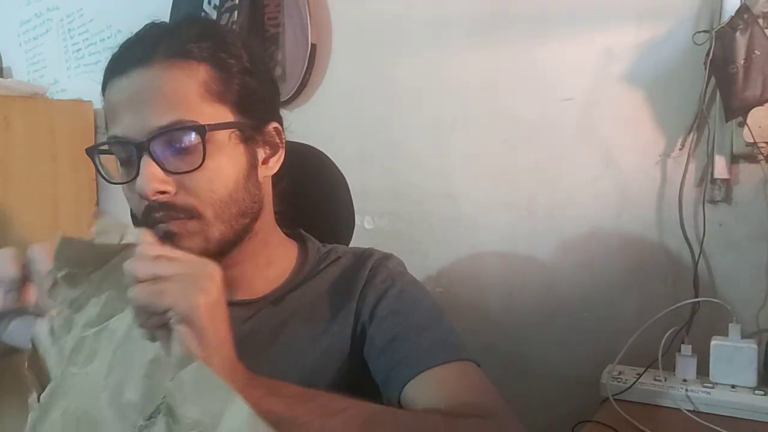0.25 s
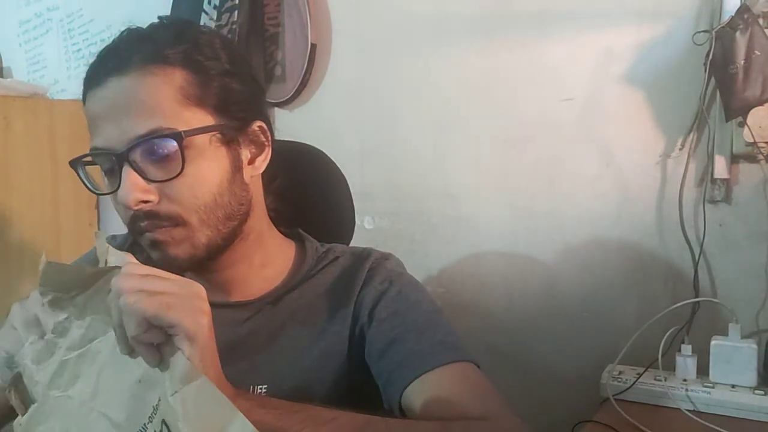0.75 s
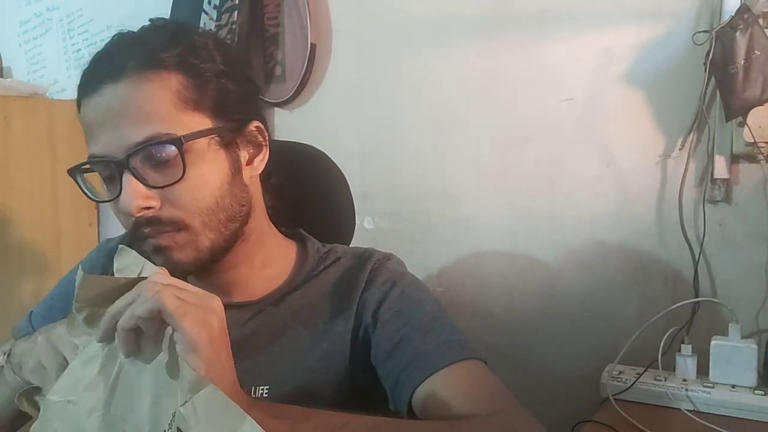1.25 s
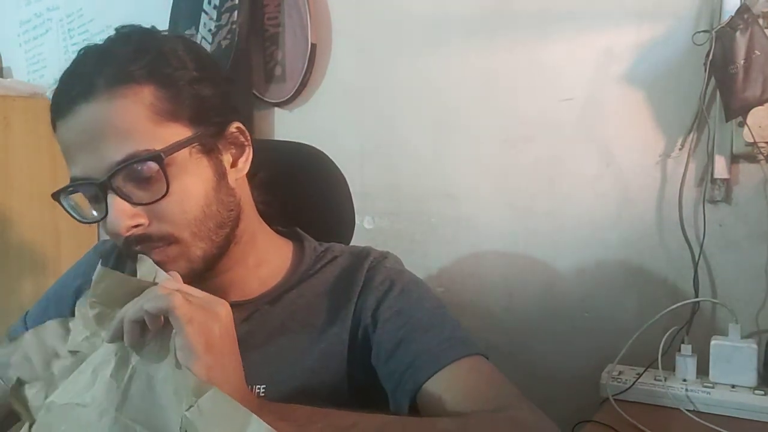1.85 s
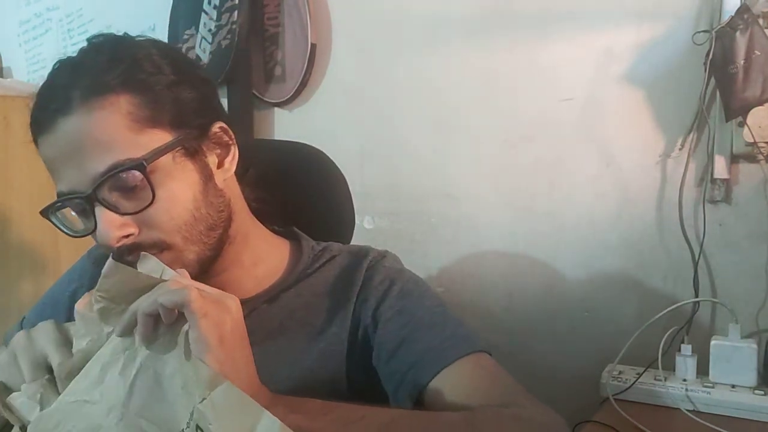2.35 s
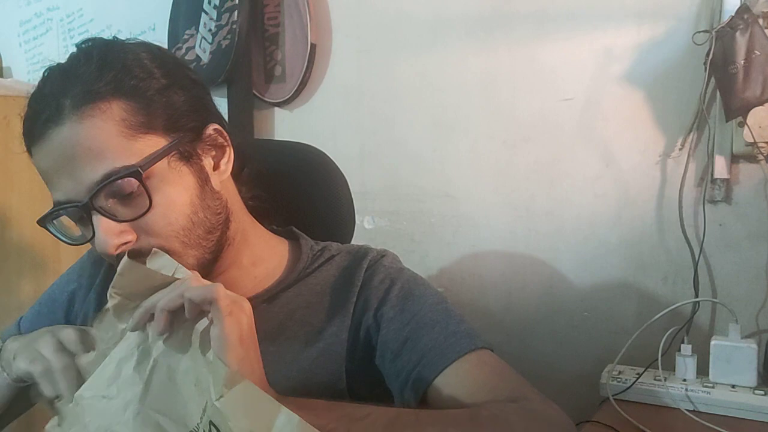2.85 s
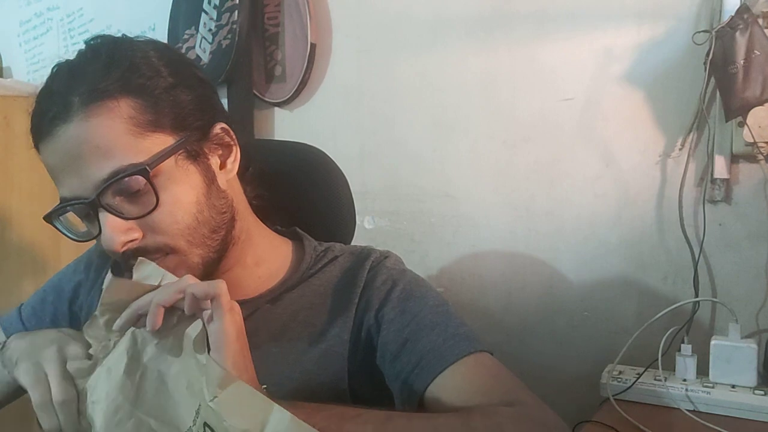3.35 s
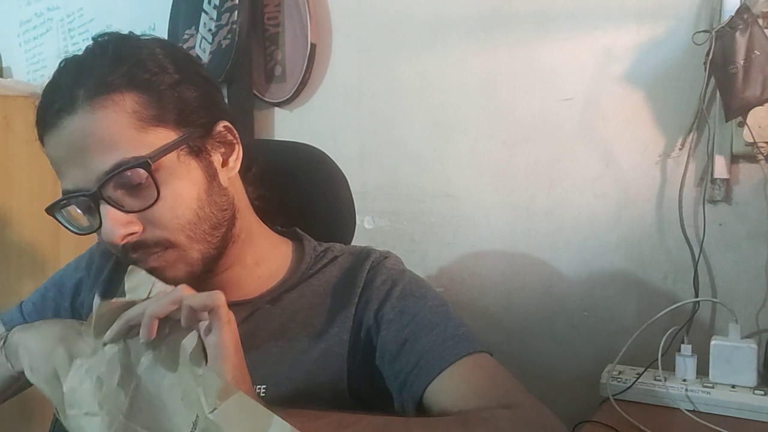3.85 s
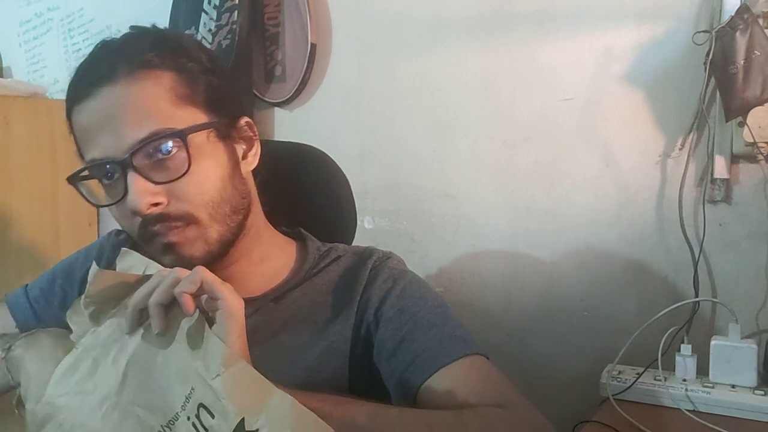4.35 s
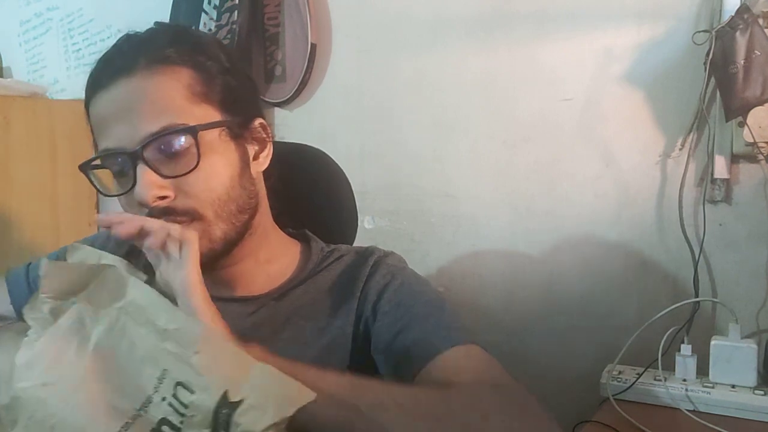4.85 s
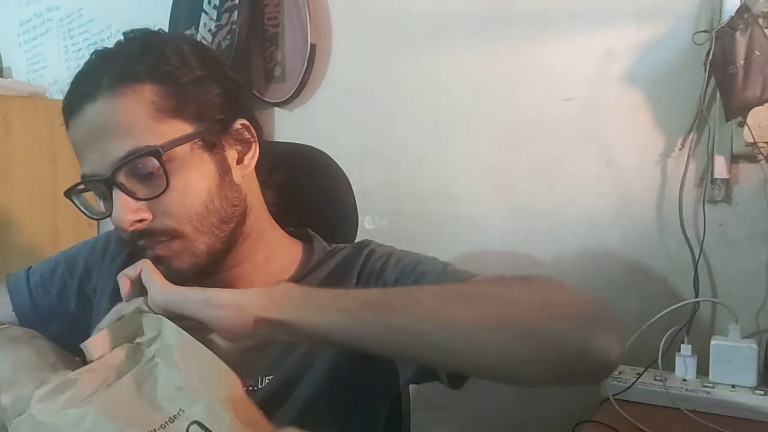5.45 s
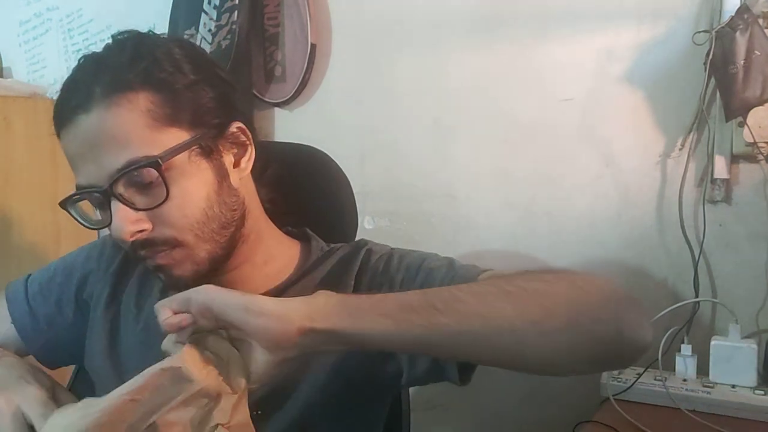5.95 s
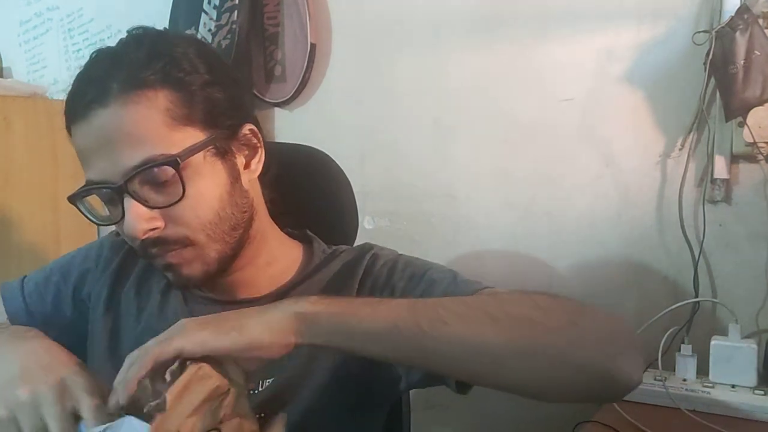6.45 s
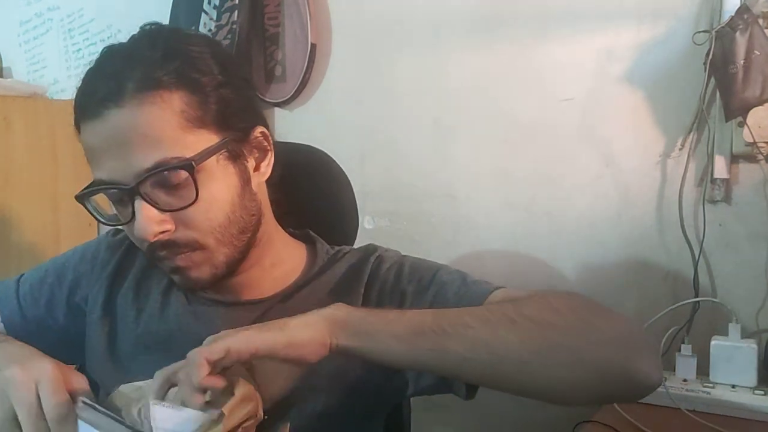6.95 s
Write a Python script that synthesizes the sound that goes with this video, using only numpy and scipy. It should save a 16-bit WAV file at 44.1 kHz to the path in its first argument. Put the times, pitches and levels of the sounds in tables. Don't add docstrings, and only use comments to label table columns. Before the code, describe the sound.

Hands work open a thick paper bag at a desk: sharp crease snaps, rustling clumps, one hard tearing crunch, soft fan air behind.

```python
import sys
import numpy as np
from scipy import signal
from scipy.fft import rfft, irfft
from scipy.io import wavfile

SR = 44100
rng = np.random.default_rng(int(sys.argv[2]) if len(sys.argv) > 2 else 0)


def natural_amplitude(level_db):
    exponent = np.asarray(level_db, float) / 20
    return 10 ** exponent


def store_wav(level_fs):
    pcm = np.round(np.clip(np.atleast_2d(level_fs), -1, 1) * 32767)
    wavfile.write(sys.argv[1], SR, pcm.T.astype(np.int16))


N = 317961


def rms_one(x):
    return x / np.sqrt(np.mean(x ** 2) + 1e-20)


def band(x, low_hz, high_hz, order=2):
    return signal.sosfilt(signal.butter(order, [low_hz, high_hz], "band", fs=SR, output="sos"), x)


def drift(rate_hz):
    r = np.exp(-2 * np.pi * rate_hz / SR)
    noise = rng.standard_normal(N + SR)
    return rms_one(signal.lfilter([1], [1, -2 * r, r * r], noise)[SR:])


def resonance(x, hz, width_hz):
    r = np.exp(-np.pi * width_hz / SR)
    gain = (1 - r * r) / 2
    return signal.lfilter([gain, 0, -gain], [1, -2 * r * np.cos(2 * np.pi * hz / SR), r * r], x)


def add(out, s, shape):
    i = max(round(s * SR), 0)
    out[i:i + len(shape)] += shape[:N - i]


def efforts(rows, attack_s, fade_db_per_s, rest_db, rest_second_db):
    t = np.arange(N) / SR
    power = np.ones((2, N)) * natural_amplitude([[2 * rest_db], [2 * (rest_db + rest_second_db)]])
    for s, hold_s, level_db, second_db in rows:
        rise = np.clip((t - s) / attack_s, 0, 1)
        fade = natural_amplitude(-fade_db_per_s * np.maximum(t - s - hold_s, 0))
        power += (rise * fade) ** 2 * natural_amplitude([[2 * level_db], [2 * (level_db + second_db)]])
    return 10 * np.log10(power)


# f/Hz, level/dB per Hz
AIR_COLOUR = [
    (150, -16),
    (300, 5),
    (390, 10),
    (500, -0.5),
    (1600, 1),
    (2300, -12.5),
    (4000, -9),
    (7500, -36),
]


def room_noise():
    hz, level_db = np.transpose(AIR_COLOUR)
    grid_hz = np.fft.rfftfreq(N, 1 / SR) + 1
    colour = natural_amplitude(np.interp(np.log(grid_hz), np.log(hz), level_db, left=-40))
    return natural_amplitude(-58) * rms_one(irfft(rfft(rng.standard_normal(N)) * colour, N))


PORT_HZ, PORT_WIDTH_HZ, PORT_DB = 6414, 840, 13.5


def snaps(rows):
    out, ms = np.zeros(N), 1000 * np.arange(500) / SR
    bursts = rng.standard_normal((len(rows), len(ms) + 1))
    for (s, peak_db, *_), (slowness, *noise) in zip(rows, bursts):
        age = ms / (.43 * natural_amplitude(2.5 * slowness))
        crack = band(noise * age ** 2 * np.exp(-age), 4200, 7900)
        heard = np.abs(resonance(crack, PORT_HZ, PORT_WIDTH_HZ))
        add(out, s - heard.argmax() / SR - .0004, natural_amplitude(peak_db - 17.5) * crack / heard.max())
    return out


def pops(rows):
    out, t = np.zeros(N), np.arange(500) / SR
    bursts = rng.standard_normal((len(rows), len(t)))
    for (s, peak_db, hz), noise in zip(rows, bursts):
        burst = (t == 0) + 0.2 * noise * np.exp(-t / 0.0041)
        panel = resonance(burst, hz, .5 * hz) + 0.23 * band(burst, 330, 3600, order=1)
        add(out, s - .0007, natural_amplitude(peak_db + 1.0) * panel / np.abs(panel).max())
    return out


def small_creases(level_db):
    when, size, pitch = rng.random((220, 3)).T
    size_db = -3.5 * np.log(np.maximum(size, .2))
    grip_db = level_db[(when * N).astype(int)]
    return np.transpose([when * N / SR, grip_db + size_db, 1000 * 3.9 ** pitch])


def rustle(level_db, dull_db, per_s=1100, spread_db=4.0, clump_db=4):
    clumps = natural_amplitude(clump_db * drift(45))
    sizes = natural_amplitude(spread_db * np.minimum(rng.exponential(1, N), 3.5)) * rng.choice([-1, 1], N)
    clicks = sizes * (rng.random(N) < per_s * clumps / SR) + 1e-18
    pitches, dealt = np.geomspace(600, 7800, 16), rng.integers(0, 16, N)
    rings = [resonance(clicks * (dealt == k), hz, .5 * hz) for k, hz in enumerate(pitches)]
    slide = rng.standard_normal(N) * np.sqrt(clumps)
    bright = rms_one(sum(rings[12:])) + 0.4 * rms_one(band(slide, 2700, 10000))
    dull = rms_one(sum(rings[:12])) + 0.58 * rms_one(band(slide, 370, 5000, order=1))
    return natural_amplitude(level_db - 11.5) * bright + natural_amplitude(dull_db - 3.5) * dull


# start t/s, hold t/s, rustle level/dB, dull part against it level/dB
GRIPS = [(0.0, 0.016, -44.5, -16), (0.207, 0.15, -43, -1.5), (0.655, 0.16, -46, -6),
         (0.946, 0.064, -41, -12.5), (1.089, 0.086, -43.5, -1), (1.418, 0.054, -44, 0),
         (1.54, 0.11, -45.5, -2), (1.686, 0.075, -42.5, -1.5), (1.915, 0.085, -43, -0.5),
         (2.14, 0.047, -46.5, -13), (2.593, 0.12, -50.5, 3), (3.017, 0.17, -42, -5.5),
         (3.107, 0.17, -42, -1.5), (3.442, 0.21, -43, -10), (3.678, 0.2, -44.5, -2.5),
         (3.963, 0.06, -41.5, -3), (4.063, .28, -41.5, -3.5), (4.5, 0.12, -52, -5),
         (4.785, 0.097, -49.5, 0.5), (5.067, 0.12, -40, -5), (5.224, .21, -43.5, 1),
         (5.586, 0.15, -39.5, -2.5), (5.69, 0.16, -37, -2.5), (5.833, 0.084, -26, -4.5),
         (5.96, 0.031, -36, -5), (6.051, 0.065, -33, -2.5), (6.281, 0.3, -46, -1),
         (6.741, 0.075, -41.5, -7), (6.927, 0.07, -47.5, -3), (6.988, 0.27, -41.5, -4.5)]


def grips():
    bright_db, dull_db = efforts(GRIPS, attack_s=.008, fade_db_per_s=153.5, rest_db=-53.5, rest_second_db=-1.5)
    small_snaps = snaps(small_creases(bright_db + 10))
    small_pops = pops(small_creases(dull_db + 3.5))
    return rustle(bright_db, dull_db) + small_snaps + small_pops


# peak t/s, snap level/dB, pop level/dB, pop f/Hz
FOLDS = [(0.0057, -23, -30, 1020), (0.0609, -20, -30.5, 1500), (0.2116, -29, -26, 3170),
         (0.284, -16, -24, 1860), (0.7134, -35, -28, 3770), (1.0944, -24, -30.5, 1460),
         (1.127, -30, -28, 2900), (1.295, -31, -27, 1530), (1.4527, -4, -22.5, 1290),
         (1.5617, -24, -30.5, 2170), (1.9458, -23, -27, 1690), (1.9681, -17, -27, 3140),
         (2.0562, -20, -30.5, 1030), (2.6041, -20, -29.5, 2500), (2.753, -17.5, -32.5, 3020),
         (3.2593, -13, -25.5, 1480), (3.4548, -13, -27.5, 2500), (3.7083, -7, -24.5, 1590),
         (3.7944, -6.5, -24.5, 2200), (4.079, -19, -22.5, 2660), (4.261, -31, -26.5, 2580),
         (4.2915, -8, -25, 1610), (4.335, -31.5, -19.5, 3100), (4.5045, -16.5, -28, 1720),
         (5.2879, -19, -24.5, 1940), (5.3723, -18, -23.5, 3500), (5.4932, -14, -25, 3620),
         (6.384, -18, -29, 1980), (7.067, -40, -25, 3550), (7.1036, -13, -24, 3320)]


def folds():
    return snaps(FOLDS) + pops([(s - .001, pop_db, hz) for s, _, pop_db, hz in FOLDS])


# delay t/s, level/dB
DESK_ECHOES = [
    (.0065, -13),
    (.012, -16),
]


def room(x):
    places, t60_s = 6, 0.2
    t = np.arange(round(.4 * SR)) / SR
    place = rng.integers(0, places, N // 512 + 1).repeat(512)[:N]
    out = x.copy()
    for k in range(places):
        tail = rng.standard_normal(len(t)) * natural_amplitude(-60 * t / t60_s) * np.minimum(t / .003, 1)
        answer = natural_amplitude(-8) * tail / np.sqrt(np.sum(tail ** 2))
        for lag_s, echo_db in DESK_ECHOES:
            answer[round(lag_s * rng.uniform(.8, 1.2) * SR)] += natural_amplitude(echo_db)
        out += signal.fftconvolve(x * (place == k), answer)[:N]
    return out


# start t/s, hold t/s, buffet level/dB, quick eddies against it level/dB
GUSTS = [(0.04, 0.035, -38, 4.5), (0.2, 0.23, -42, -21), (0.47, 0.25, -36.5, -2), (0.74, .16, -40.5, 4),
         (1.0, 0.28, -46, -16), (1.3, 0.34, -47.5, -6), (1.7, 0.16, -44, -18), (2.05, 0.11, -43.5, -23),
         (2.33, 0.2, -46.5, -18), (2.74, 0.1, -40, -7), (2.96, 0.17, -37.5, 4), (3.15, 0.32, -45, -8),
         (3.5, 0.18, -40, -12.5), (3.85, 0.27, -45.5, -16), (4.5, .22, -39.5, -19),
         (4.95, 0.063, -40.5, -15), (5.13, 0.45, -40.5, -11), (5.6, 0.26, -39.5, -6),
         (5.93, 0.22, -46.5, -14), (6.22, 0.062, -41, -2), (6.41, 0.31, -41.5, -15), (6.8, 0.079, -39, -3),
         (7.02, 0.11, -36, -9)]


def gusts():
    slow_db, fast_db = efforts(GUSTS, attack_s=0.019, fade_db_per_s=74, rest_db=-55, rest_second_db=-11.5)
    lumps = natural_amplitude(3.5 * drift(10))
    deep = band(rng.standard_normal(N), 10, 100) * lumps
    fast = band(rng.standard_normal(N), 90, 233.0, order=3) * lumps * natural_amplitude(5.8 * drift(14))
    return natural_amplitude(slow_db - 0.5) * rms_one(deep) + natural_amplitude(fast_db - 14.5) * rms_one(fast)


# peak t/s, peak level/dB, f/Hz
PUFFS = [(0.099, -28, 118), (0.223, -34.5, 102), (0.322, -33.5, 122), (0.615, -33, 147),
         (0.688, -29.5, 109), (0.75, -37, 97), (0.807, -30, 213), (0.843, -28, 117), (0.858, -30.5, 184),
         (0.895, -28, 117), (1.453, -29, 125), (2.151, -32, 117), (2.778, -39, 118), (2.846, -31.5, 130),
         (3.002, -27.5, 123), (3.04, -34, 170), (4.567, -36.5, 127), (5.018, -33, 90), (5.64, -26, 196),
         (5.782, -31, 103), (5.8, -28.5, 133), (6.083, -29.5, 120), (6.266, -34, 144), (6.447, -30.5, 95),
         (6.532, -27.5, 175), (6.875, -23.5, 147), (7.051, -31.5, 245), (7.064, -32, 266), (7.075, -29, 88),
         (7.102, -41, 106)]


def puffs():
    out = np.zeros(N)
    for s, peak_db, hz in PUFFS:
        cycles = np.linspace(-1.5, 1.5, round(3 * SR / hz))
        pulse = np.cos(2 * np.pi * cycles + 0.26) * np.exp(-(cycles / 0.42) ** 2)
        add(out, s - 1.38 / hz, natural_amplitude(peak_db + 1.5) * pulse)
    return out


# peak t/s, peak level/dB
SNAPS = [(0.1393, -27.5), (0.245, -18), (0.3602, -26), (0.8065, -16.5), (1.3633, -19.5), (1.4986, -22),
         (1.766, -23), (1.8517, -22.5), (2.4194, -23.5), (2.7226, -19), (3.1474, -18.5), (3.5979, -14),
         (3.6368, -26), (3.7243, -13.5), (3.7295, -8), (3.74, -25), (3.969, -20.5), (3.9865, -16),
         (4.0974, -14.5), (4.143, -19.5), (4.1969, -15), (4.6481, -25.5), (4.8095, -16.5), (4.8961, -21),
         (5.145, -18.5), (5.3519, -14.5), (6.342, -16), (6.4514, -19), (6.7668, -18.5), (7.0063, -9)]


def lone_snaps():
    return snaps(SNAPS)


# peak t/s, peak level/dB, f/Hz
POPS = [(0.1853, -31, 930), (0.4113, -26.5, 3230), (0.7406, -31, 3630), (1.0131, -26.5, 2860),
        (1.4789, -24.5, 1610), (1.65, -31, 1540), (2.497, -38, 3180), (2.7106, -29.5, 1340),
        (3.0167, -34, 2860), (3.5596, -28.5, 3250), (3.6201, -30, 1860), (3.674, -26, 3360),
        (3.877, -32, 1990), (4.0007, -34, 1340), (4.2266, -28, 1530), (4.244, -30, 2800),
        (4.3007, -25, 3830), (4.382, -28, 3580), (4.582, -34.5, 1920), (5.0135, -35.5, 3880),
        (5.061, -30.5, 3750), (5.2669, -36, 3570), (5.6518, -25.5, 1820), (5.697, -19, 1860),
        (5.8374, -18, 1380), (5.8447, -12.5, 3420), (5.9415, -20.5, 3050), (5.9476, -11.5, 2970),
        (6.0539, -20.5, 3590), (6.7127, -30, 2540)]


def lone_pops():
    return pops(POPS)


# peak t/s, peak level/dB
TICKS = [(0.395, -25), (0.4816, -34), (0.5898, -24.5), (0.7783, -24.5), (0.9528, -42), (1.441, -26),
         (1.9243, -39), (2.294, -35), (2.3563, -27), (2.6755, -30), (2.8327, -29.5), (3.058, -32),
         (3.3418, -28), (3.4, -25), (3.5156, -30), (4.1215, -19.5), (4.1688, -24), (4.5678, -37),
         (4.7418, -34.5), (5.1312, -20), (5.1847, -21), (5.2548, -27.5), (5.5277, -25), (4.1904, -26.5),
         (6.296, -25.5), (6.3256, -19.5), (6.5442, -21.5), (6.7846, -29.5), (6.8103, -25), (6.9423, -31.5)]


def ticks():
    return snaps(TICKS)


# t/s, f/Hz, level/dB
HORN = [
    (3.57, 787, -88),
    (3.6, 775, -55.5),
    (3.73, 763, -52),
    (3.78, 790, -98),
]


def horn():
    s, horn_hz, horn_db = np.transpose(HORN)
    t = np.arange(N) / SR
    hz, level_db = np.interp(t, s, horn_hz), np.interp(t, s, horn_db)
    return natural_amplitude(level_db) * np.sin(2 * np.pi * np.cumsum(hz) / SR)


# peak t/s, peak level/dB
WRENCH = [(5.5945, -17.5), (5.6424, -22), (5.686, -20), (5.731, -19), (5.754, -14), (5.804, -18.5),
          (5.813, -6.5), (5.8351, -3), (5.8402, -1.5), (5.8463, -26), (5.86, -5), (5.8709, -10.5),
          (5.8828, -6), (5.8923, -16.5), (5.9094, -27), (5.935, -15.5), (5.943, -17), (5.95, -23),
          (5.9687, -9), (5.995, -11), (6.0266, -13), (6.052, -17.5), (6.0766, -7.5), (6.118, -20),
          (6.1291, -1.5), (6.13, -15), (6.143, -10), (6.185, -23)]


def wrench():
    return snaps(WRENCH)


# t/s, peak level/dB, f/Hz
KNOCKS = [
    (6.221, -38, 780),
    (6.283, -29.5, 740),
]


def knocks():
    out, t = np.zeros(N), np.arange(900) / SR
    for s, peak_db, hz in KNOCKS:
        swell_and_decay = t / 0.0031 * np.exp(1 - t / 0.0011)
        add(out, s, natural_amplitude(peak_db + 5.5) * np.sin(2 * np.pi * hz * t) * swell_and_decay)
    return out


# peak t/s, peak level/dB
RUMMAGE = [(6.4248, -26), (6.4762, -31), (6.5138, -20), (6.522, -25.5), (6.574, -28), (6.7, -24),
           (6.828, -25), (6.9125, -32), (6.921, -27.5), (6.9862, -21), (6.989, -23), (7.045, -35),
           (7.089, -31), (7.122, -20), (7.139, -24), (7.168, -29), (7.2041, -28.5)]


def rummage():
    return snaps(RUMMAGE)


def scene():
    creases = lone_snaps() + ticks() + wrench() + rummage()
    paper = grips() + folds() + creases + lone_pops()
    air = gusts() + puffs()
    return (room(paper + knocks()) + air + horn() + room_noise())[None]


def low_pass(x):
    return signal.sosfilt(signal.butter(12, 8910, fs=SR, output="sos"), x)


def record(dry):
    converter_hz, cutoff_hz, playback_cut_hz = 16000, 7610, 8110
    x = dry + natural_amplitude(PORT_DB) * resonance(dry, PORT_HZ, PORT_WIDTH_HZ)
    x = .6 * np.tanh(x / .6)
    x = signal.sosfilt(signal.cheby1(10, .3, cutoff_hz, fs=SR, output="sos"), x)
    x = x * (1 + 2 * np.cos(2 * np.pi * converter_hz * np.arange(N) / SR))
    x = signal.sosfilt(signal.cheby1(18, .3, playback_cut_hz, fs=SR, output="sos"), x)
    return low_pass(x)


dry = scene()
out = record(dry)
store_wav(out)
```